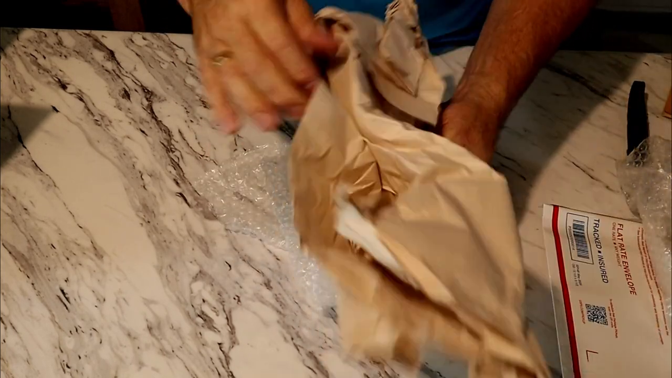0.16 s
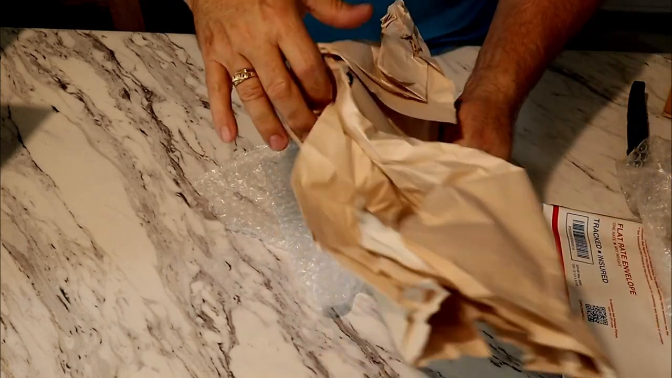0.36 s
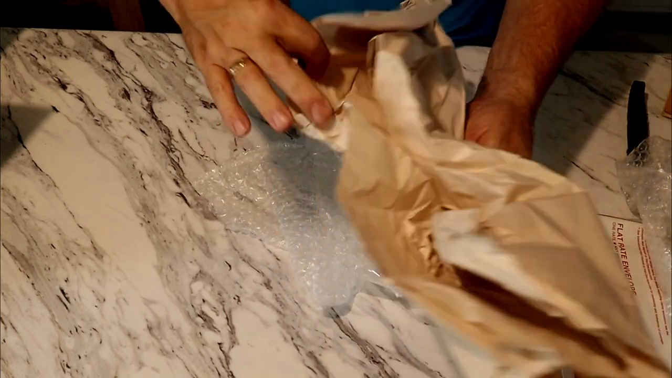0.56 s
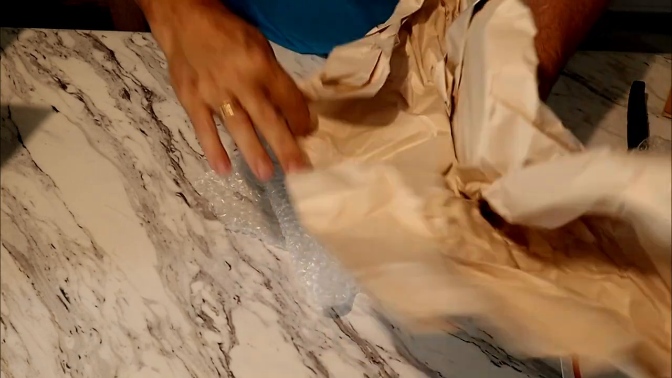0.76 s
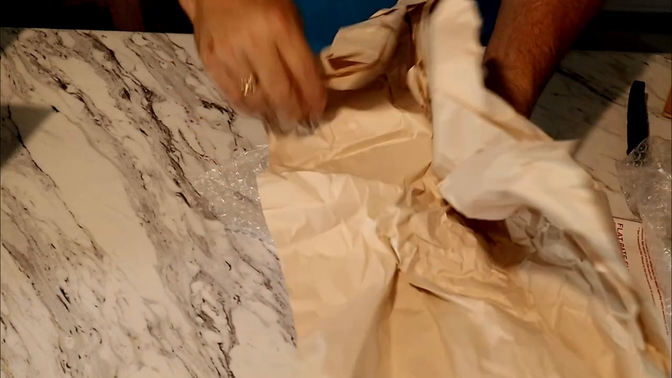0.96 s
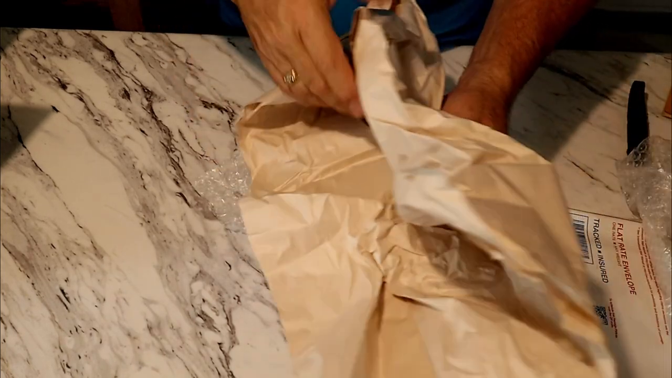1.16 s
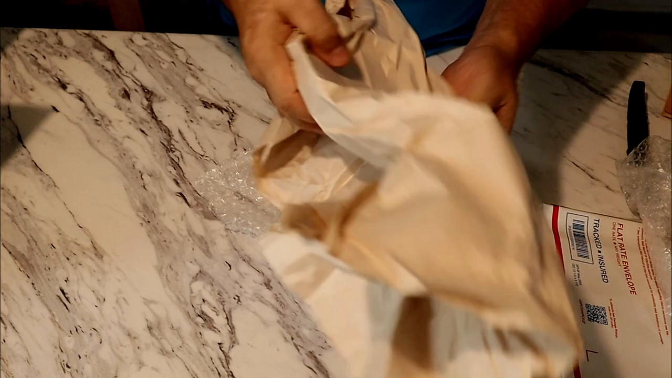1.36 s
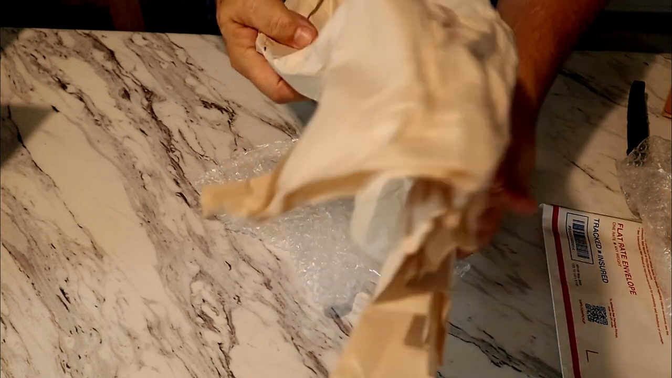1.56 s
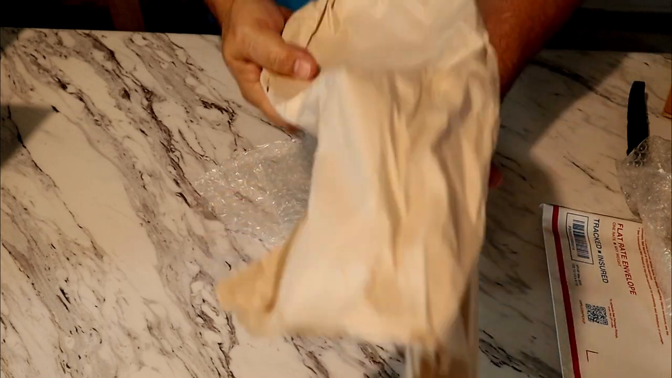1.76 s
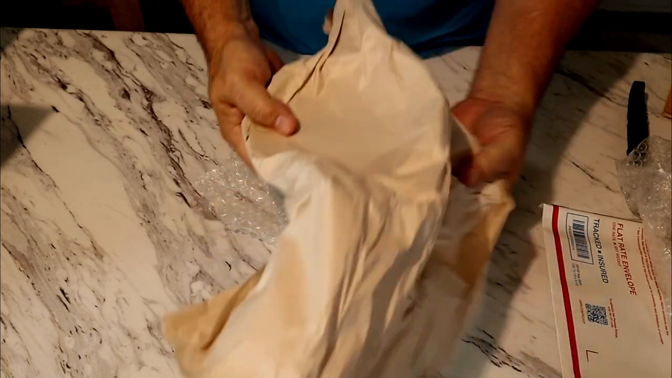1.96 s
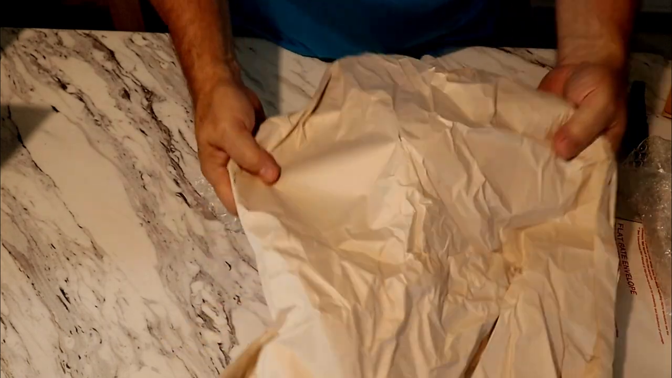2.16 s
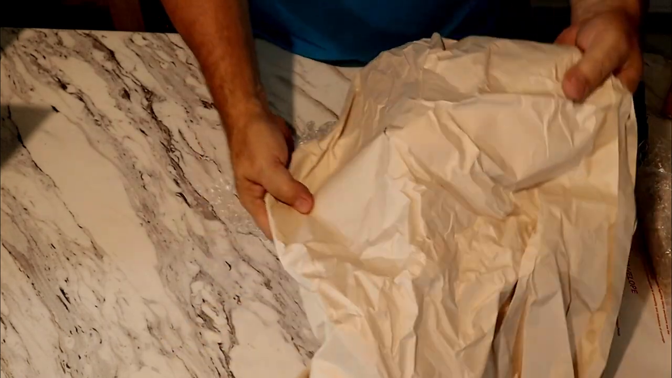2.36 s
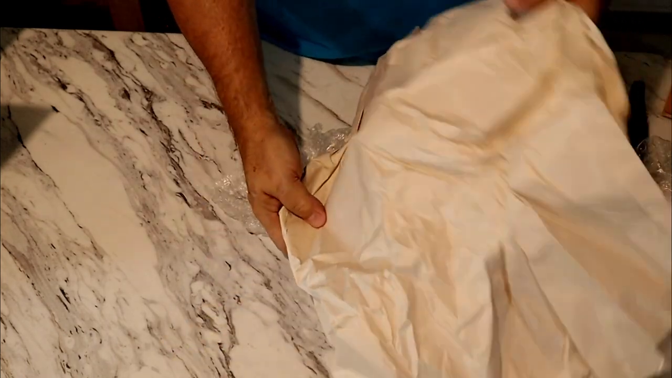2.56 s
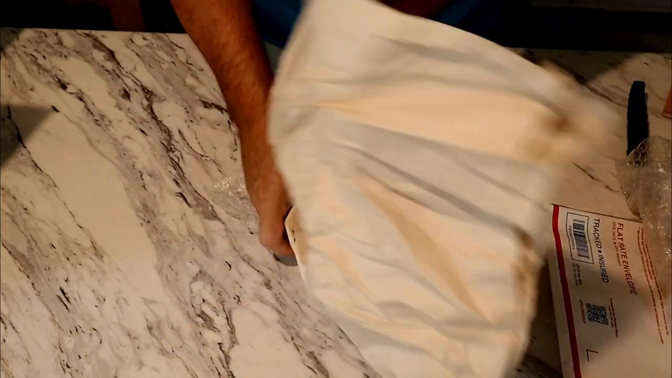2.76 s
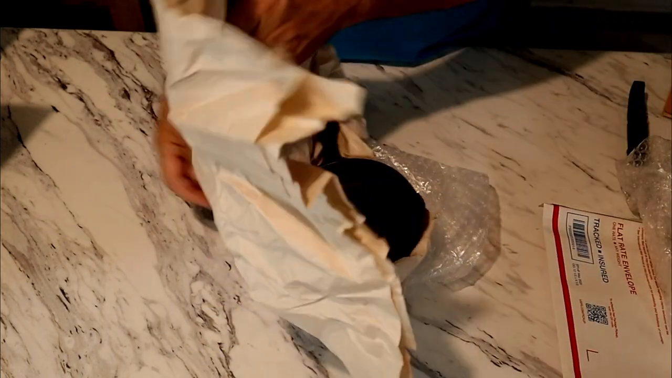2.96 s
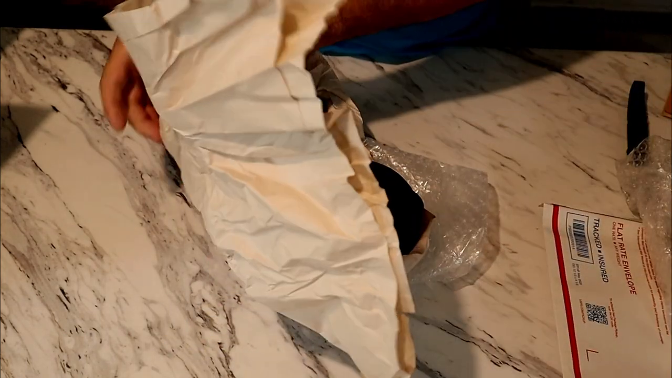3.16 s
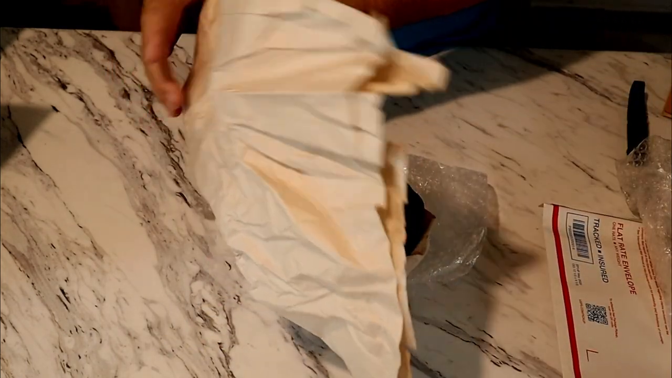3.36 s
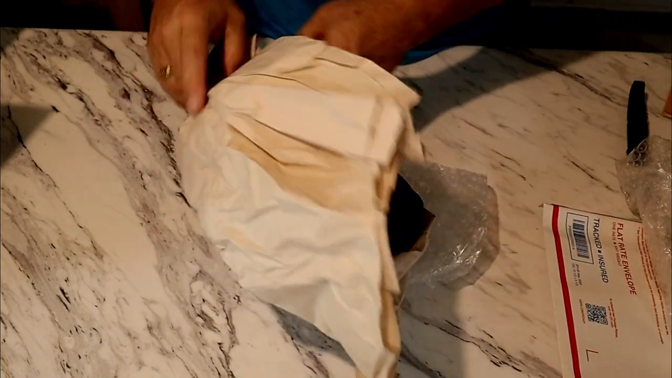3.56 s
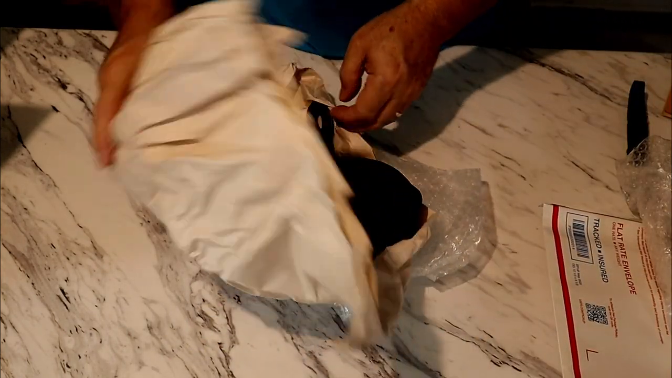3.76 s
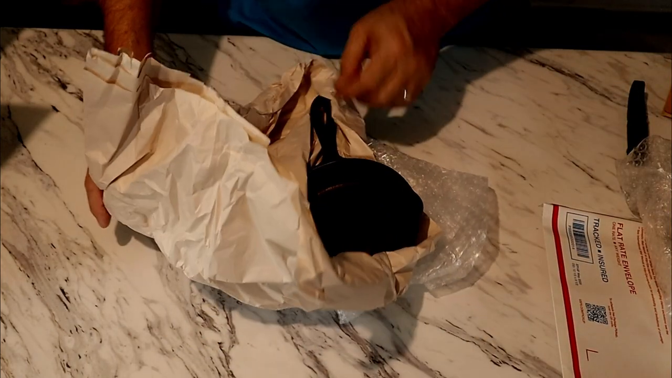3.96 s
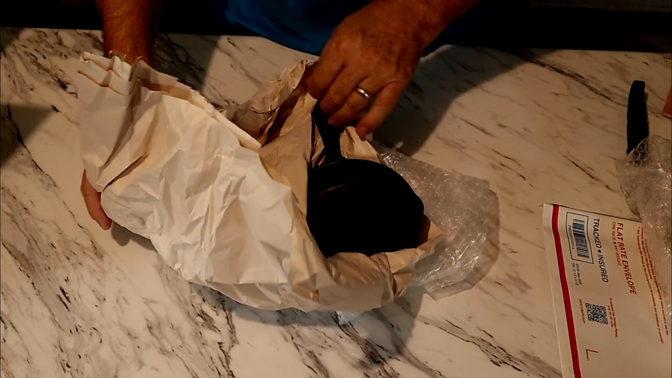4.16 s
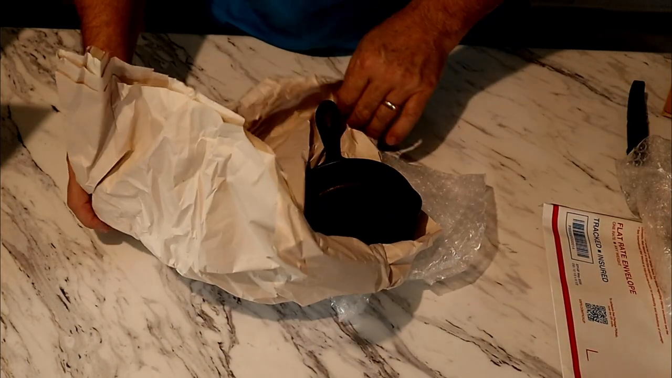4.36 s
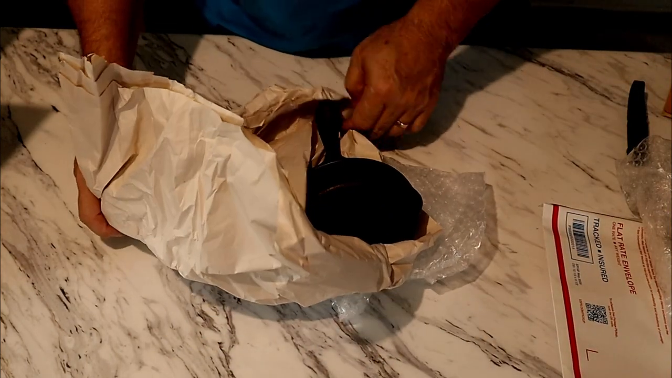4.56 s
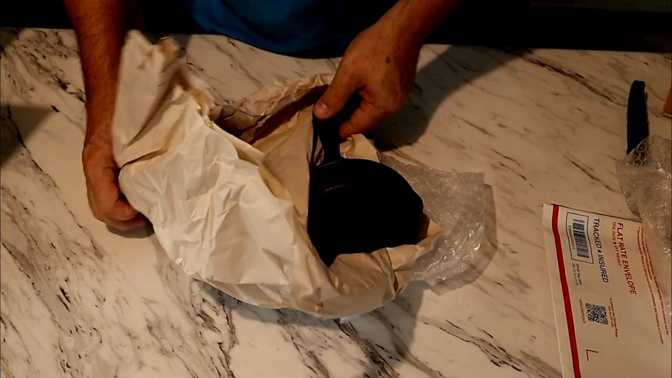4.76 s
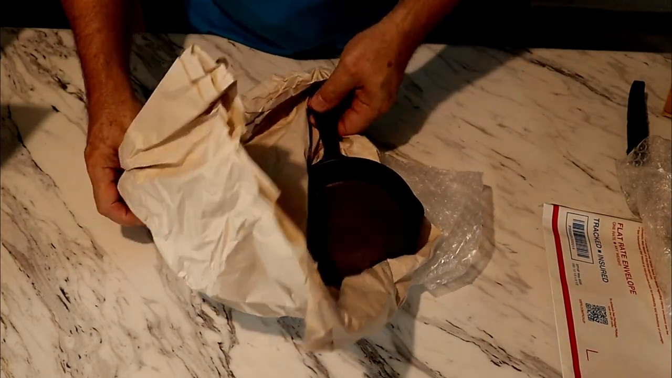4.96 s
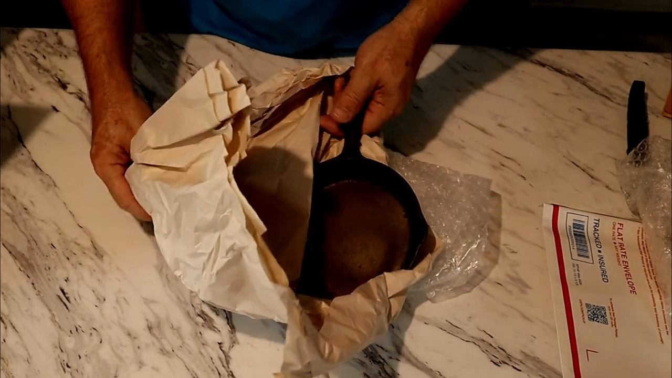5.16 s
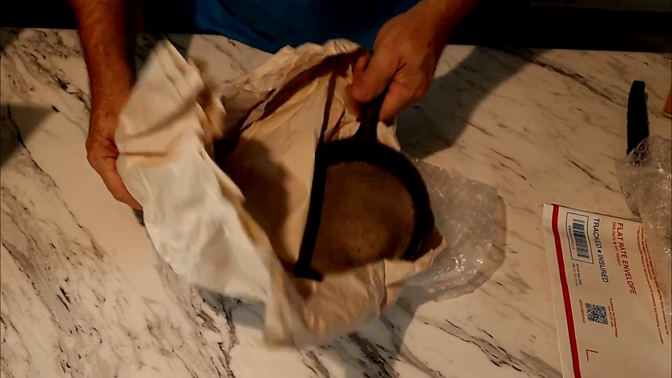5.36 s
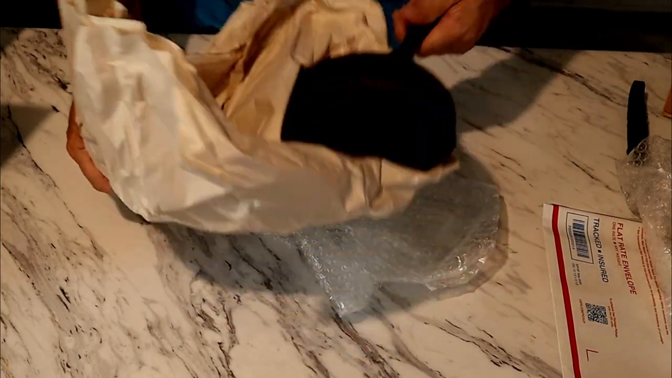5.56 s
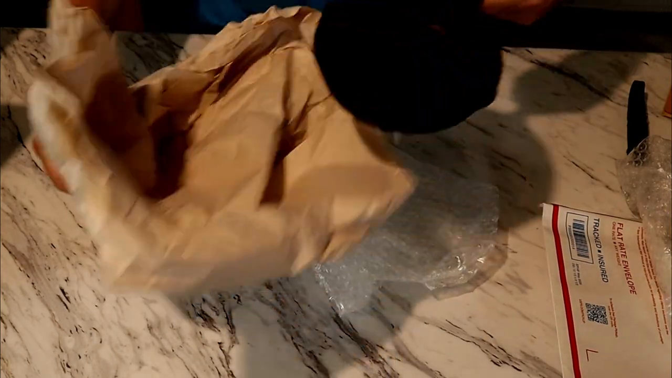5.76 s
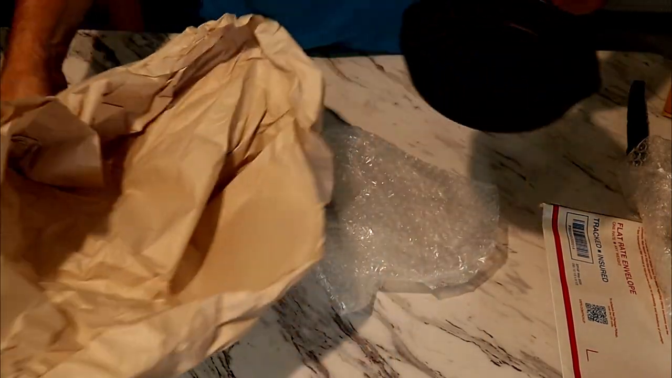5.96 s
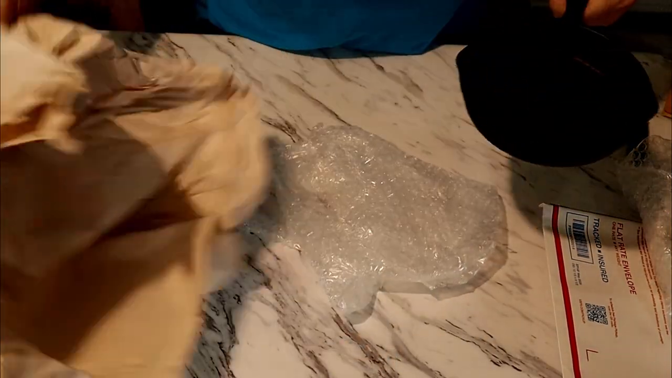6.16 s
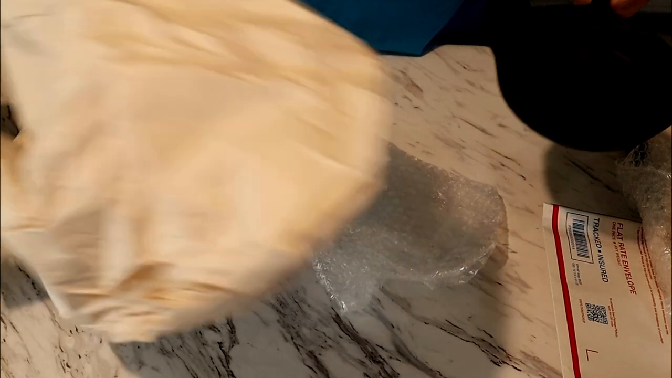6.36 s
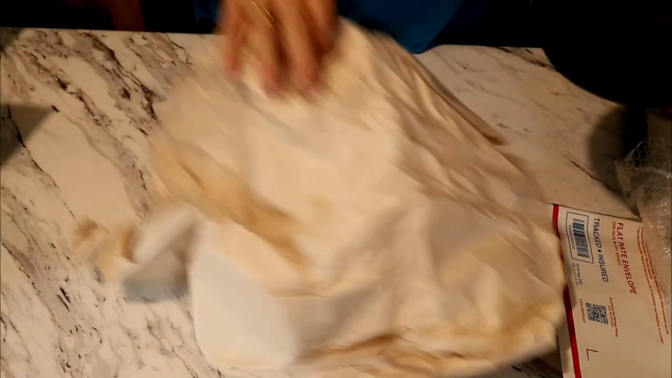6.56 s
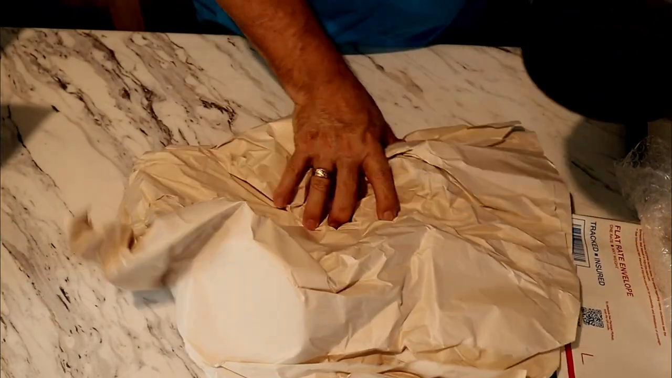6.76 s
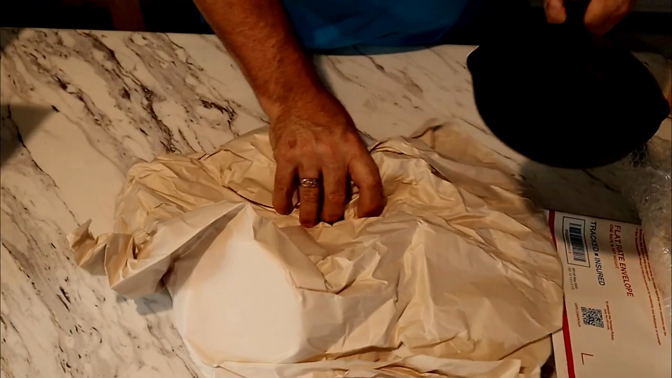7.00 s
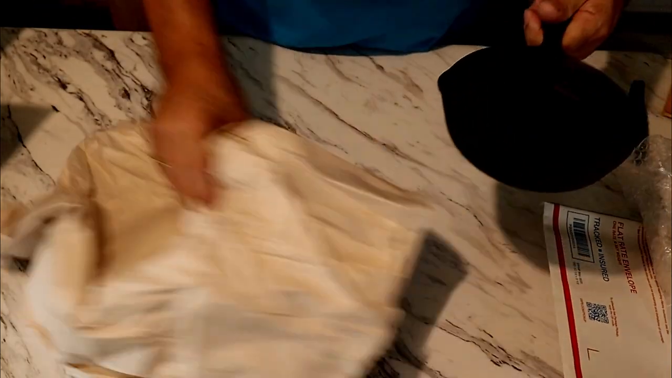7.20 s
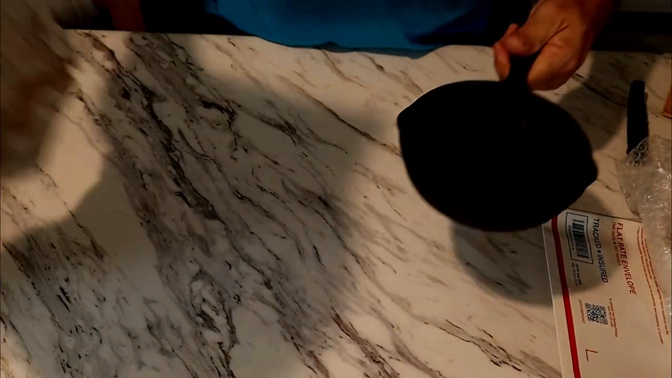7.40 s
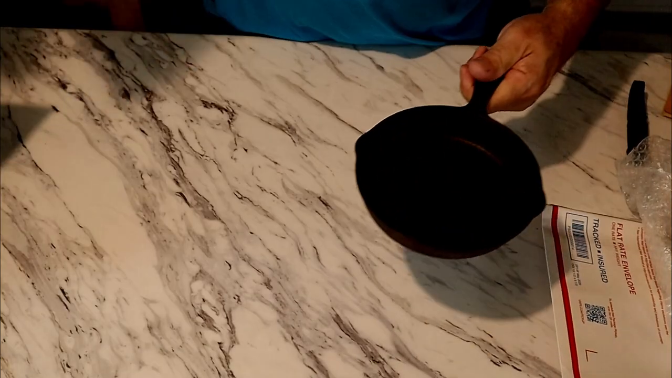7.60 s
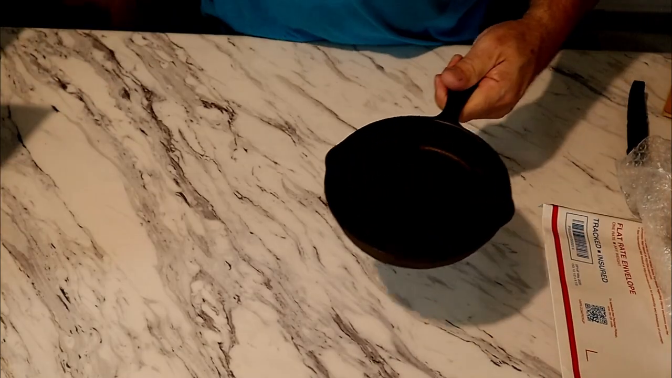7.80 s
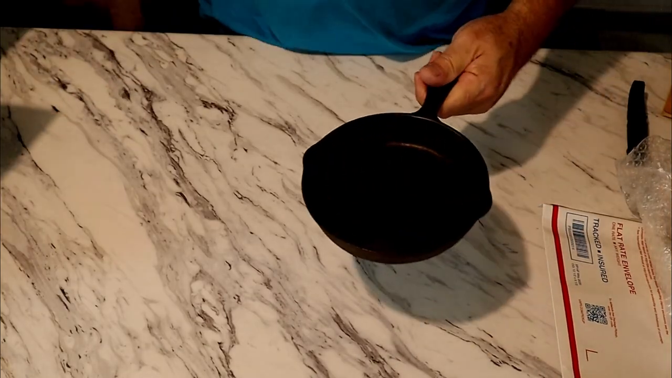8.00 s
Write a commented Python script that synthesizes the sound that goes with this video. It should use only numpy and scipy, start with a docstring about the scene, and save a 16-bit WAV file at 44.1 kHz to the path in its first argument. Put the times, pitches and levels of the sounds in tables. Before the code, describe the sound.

Close up in a small room, hands shake and pull stiff packing paper over a counter. Dense crinkling comes in short irregular strokes full of snapping creases, with a strong boomy flap near two seconds. Soft low bumps accompany the pan's unwrapping. After a quieter moment, the paper is pushed down in a loud crunch, swept aside, and fades to faint rustles over quiet room tone.

```python
"""A small room, at a counter, close microphone: crumpled packing paper comes off a small skillet lying
on bubble wrap, is shaken out and pushed aside. Strokes of the hands set filtered noise and swarms of
small crinkles sliding and flexing; single creases snap in two quick steps of crack, ring and pop.
Damped low resonances make the sheet's booms and the counter's bumps. A decaying noise tail is the
room's answer, steady noise its background; the highest peaks overload and are rounded off."""
import sys
import numpy as np
from scipy import signal
from scipy.fft import rfft, irfft, next_fast_len
from scipy.io import wavfile
from scipy.ndimage import uniform_filter1d

SR = 44100
rng = np.random.default_rng(int(sys.argv[2]) if len(sys.argv) > 2 else 0)


def wrap_up_sound(samples):
    """Save the sound to the file named by the first command line argument, as 16-bit audio."""
    columns = np.atleast_2d(samples).T
    # keep every value between -1 and 1, then stretch to whole-number steps
    tamed = np.clip(columns, -1, 1)
    steps = np.round(tamed * 32767).astype(np.int16)
    wavfile.write(sys.argv[1], SR, steps)


N = 354420  # length of the scene [samples]

# steady background of the room: (frequency [Hz], relative level per Hz [dB])
AMBIENCE_COLOUR = [(25, -13), (120, 1.5), (700, -4), (15000, -24)]
# pulls, shakes and pushes of the sheet; levels come before the trims of the bands in sheet():
# (start [s], length [s], level at mid-stroke [dB], swell from start to end [dB], low flexing re level [dB],
#  crisp treble re level [dB], tautness as upper over lower rustle [dB])
HAND_STROKES = [(0.003, 0.14, -24.5, -7.5, -5.5, -4.5, 2.5), (0.199, 0.046, -26, -3, -5, -3.5, 3.5),
                (0.322, 0.021, -23, 1.5, -5.5, -4, 2.5), (0.466, 0.2, -25, 2, -6.5, -3.0, 4),
                (0.789, 0.085, -26.5, -7, -2.5, -7, 3), (0.876, 0.18, -25.5, 0.5, -4, -2.5, 6),
                (1.152, 0.024, -32.0, 1, -5, 0.5, -3), (1.313, 0.039, -29, 4.5, -5, -1, 4),
                (1.48, 0.16, -29.5, -9, -7.5, -4, 3.5), (1.891, 0.023, -25.5, 5.5, -11, -5, 5.5),
                (1.984, 0.16, -22, -6.5, -3, -5, 3.5), (2.208, 0.085, -21.5, 5, -2, -7.0, 3),
                (2.487, 0.16, -27.5, 0.5, -2.5, -4.5, 4.0), (2.745, 0.19, -25.0, 3.5, -6.5, -7.5, 5.5),
                (2.914, 0.12, -24.5, 16, -6.0, -3.5, 4.5), (3.19, 0.13, -32, -10.5, -7, -1.5, 5.5),
                (3.265, 0.07, -23, -0.5, -4, -4, 3.5), (3.51, 0.1, -22, 8, -3.5, -1.5, 4.5),
                (3.695, 0.19, -22.5, 8.0, -5, -3, 6), (3.932, 0.098, -23.5, 0.5, -4.5, -3.5, 3),
                (4.259, 0.2, -25.5, 8.5, -7, -2, 6.5), (4.521, 0.043, -27.5, 5, -5.5, -2.5, 6),
                (4.648, 0.17, -28, 15, -8, -2, 5.5), (4.907, 0.082, -27, 13.0, -5.5, -4, 8),
                (5.076, 0.37, -26.5, -7.5, -6.0, -3, 4.5), (5.464, 0.22, -21.5, 9.5, -5, -1, 5),
                (5.834, 0.055, -34.5, 11, -9, -12, 0), (5.982, 0.106, -39.5, 14.5, -5.5, -3.5, 3),
                (6.159, 0.12, -30.5, 6.5, -7.0, -0.5, 4.5), (6.365, 0.058, -33, -3, -1.5, 2, 2.0),
                (6.5, 0.17, -33.5, -4.5, -4, 0, 5), (6.678, 0.15, -17, 7, -5.5, -2, 2.5),
                (6.948, 0.088, -19, -3, -7.0, -2, 4.5), (7.102, 0.36, -28.5, -8.5, -7.0, -2.5, 5),
                (7.511, 0.23, -37, 2, -2, -3.5, -1.0), (7.865, 0.19, -32, 7, -5, -7.5, -0.5)]
# colour of the rustling sheet: (frequency [Hz], relative level per Hz [dB])
PAPER_COLOUR = [(25, -37), (60, -15.5), (125, -12.5), (290, -6), (360, -0.5), (415, -2), (490, -0.5),
                (800, 0.5), (1900, -0.5), (2500, -5.5), (3300, -2.5), (6500, -11), (11500, -23.5),
                (16000, -33)]
# fine hiss of paper gliding over bubble wrap and counter: (time [s], level re the crisp gain [dB])
GLIDE_HISS = [(0, -17), (2.7, -35), (3.3, -8.5), (3.7, -27), (5.2, -14), (6.3, -31)]
# reverberation of the room: (frequency [Hz], time to fall by 60 dB [s])
ROOM_DECAY = [(200, 0.61), (2000, 0.42), (12000, 0.42)]
# creases that buckle loudly; snaps() trims the level and raises the crack by fixed amounts:
# (time [s], level [dB], pitch of the facet [Hz], crack re level [dB], low pop re level [dB])
CREASE_SNAPS = [(0.0633, -14, 776, -29, -23), (0.103, -13, 2150, -21, -27), (0.22, -16, 1270, -18, -9),
                (0.256, -8.5, 1230, -44, -5.5), (0.293, -12.5, 1910, -15.5, -27),
                (0.3634, -12, 2260, -15, -22), (0.4659, -18, 1690, -25, -3.5),
                (0.5179, -13.5, 2330, -18, -18), (0.5735, -20, 1140, -10, 2),
                (0.584, -13.5, 2560, -21, -10), (0.6368, -14, 1890, -12.5, -22),
                (0.654, -12.5, 2250, -21, -23), (0.7048, -17, 2720, -19, -18),
                (0.7724, -13.5, 575, -24.5, -9), (0.869, -16, 2100, -22, -14),
                (0.8807, -14.5, 2300, -29, -23), (0.8923, -25.5, 1320, -10, 9),
                (0.9427, -12, 1820, -28, -7), (0.9834, -18.5, 1610, -4, 5.5), (1.161, -17.5, 1500, -8, 4),
                (1.176, -11, 1590, -34, -21), (1.2836, -13, 1800, -13.5, -13),
                (1.3397, -16.5, 2830, -17, -18), (1.387, -28, 2000, -2, -18),
                (1.4226, -15, 1900, -32, -7.5), (1.5112, -10.5, 2000, -20, -4.5),
                (1.6361, -10.5, 2060, -18.5, -7.5), (1.8803, -21.5, 2000, -22, -9),
                (1.927, -15.5, 2680, -7, -22), (1.9405, -20, 2600, -4.5, -22),
                (1.9964, -8.5, 1500, -19, -12), (2.0466, -11, 1160, -14, -16),
                (2.0627, -5.5, 1700, -19.5, -27), (2.1747, -11, 1620, -23, -10),
                (2.234, -11.5, 2280, -11.5, -5), (2.266, -13, 1400, -15, -8),
                (2.6463, -19.5, 3500, -32, -17), (2.6875, -11, 1610, -18.5, -19),
                (2.7724, -17.5, 3400, -24, -20), (2.8391, -16.5, 2620, -33, -14),
                (2.909, -14, 2200, -17, -17), (2.9767, -10.5, 1460, -16, -4),
                (3.1607, -17.5, 1890, -13.5, -4.5), (3.1803, -17.5, 1420, -14.5, -2),
                (3.2709, -7, 1110, -33, -8), (3.3094, -8, 1710, -22, -8), (3.3346, -15, 1810, -14, -5),
                (3.434, -22.5, 3500, -10.5, -18), (3.6232, -9.5, 1640, -27, -8),
                (3.9446, -8.5, 1440, -30, -6), (3.9974, -16, 1970, -18, -6), (4.068, -14, 1530, -32, -27),
                (4.224, -20.5, 1600, -46, -24), (4.278, -18.5, 2230, -31, -7.5),
                (4.3853, -10, 1570, -13, -13), (4.458, -23, 2300, -0.5, -2), (4.615, -20, 750, -27, 0),
                (4.8906, -11, 2860, -39, -9), (4.9654, -15.5, 1680, -20, 1.5),
                (5.0048, -15, 1050, -13, 0.5), (5.363, -7, 1320, -27, -10), (5.6303, -11.5, 1220, -27, -7),
                (5.7394, -8.5, 1620, -14, -3), (5.8328, -18, 2150, -34, -13), (5.951, -26, 2530, -10, -16),
                (5.986, -17, 1370, -36, -34), (6.03, -15, 1710, -18.5, -10),
                (6.4187, -11.5, 1870, -14.5, 0), (6.6045, -15, 2600, -19, -6.5),
                (6.6509, -6.5, 2330, -28, -7), (6.681, -8, 1870, -34, -12), (6.717, -9, 2530, -25, -11),
                (6.888, -20, 2400, -5, -14), (7.023, -7.5, 3200, -12.5, -23), (7.0649, -8, 1940, -20, -13),
                (7.1246, -11.5, 1190, -33, -10), (7.2034, -12, 1330, -15.5, -5.5),
                (7.424, -17, 1810, -30, -24), (7.672, -26.5, 2200, -9.5, -14)]
# hands, pan and bundle bump softly on the counter; bumps() raises the level by a fixed amount:
# (time [s], level [dB], pitch [Hz])
COUNTER_BUMPS = [(.89, -44, 90), (3.022, -30, 175), (3.255, -31, 85.5), (3.329, -34, 160),
                 (4.032, -41.5, 90), (4.385, -32.5, 124), (5.61, -41, 55), (5.70, -37, 110),
                 (6.298, -41, 90), (6.409, -34, 192), (6.748, -29, 169), (8.012, -34.5, 110)]
# large panels flap and sound the hollow under the sheet; flaps() trims the level by a fixed amount:
# (time [s], level [dB], time to fall by 60 dB [s])
PANEL_FLAPS = [(1.029, -18.5, 0.14), (1.161, -27, .1), (2.041, -5, 0.087), (2.252, -19.5, 0.41),
               (2.33, -21.5, 0.2), (2.57, -26, 0.39), (6.66, -22, 0.68)]
# resonances of that hollow: (frequency [Hz], sharpness q [no unit])
HOLLOW_MODES = [(358, 26), (490, 10)]

TOP_HZ = 16000  # band limit of the recorder
LEAD = 64  # samples in which a crease starts to give way before it flips
ATTACK_DB_PER_S, RELEASE_DB_PER_S = 650, 133  # a hand sets the paper going quickly; it settles more slowly
STEP_S, STEP_DB = 0.0022, -6.5  # second step of a crease: greatest delay, level re the first
STILL_HISS_DB, FAST_HISS_DB = -10, -5.5  # hiss re the crinkles: always there, most that speed can add


def amp(db):
    """Decibels to gain."""
    return 10 ** (np.asarray(db) / 20)


def unit(x):
    """Each row scaled to rms 1."""
    return x / np.sqrt(np.mean(x ** 2, axis=-1, keepdims=True) + 1e-20)


def along(points, hz):
    """(Hz, value) points read on a log axis."""
    f, v = np.transpose(points)
    return np.interp(np.log(hz + 1), np.log(f), v)


def coloured(x, gain):
    """x through the causal, minimum-phase filter whose gain is the given function of frequency."""
    n = x.shape[-1]
    m = 2 * next_fast_len(n)
    log_gain = np.log(np.maximum(gain(np.fft.rfftfreq(m, 1 / SR)), 1e-6))
    cepstrum = irfft(log_gain, m)
    # folding the cepstrum onto positive times makes the filter causal
    cepstrum[..., 1:m // 2] *= 2
    cepstrum[..., m // 2 + 1:] = 0
    response = np.exp(rfft(cepstrum))
    return irfft(rfft(x, m) * response, m)[..., :n]


def below(f, edge_hz, order=4):
    """Gain of a low-pass."""
    return 1 / np.sqrt(1 + (f / edge_hz) ** (2 * order))


def above(f, edge_hz, order=4):
    """Gain of a high-pass."""
    return (f / edge_hz) ** order * below(f, edge_hz, order=order)


def facet(f, hz, q):
    """Gain of a damped resonance, such as one stiff patch of paper; low q is broad."""
    return 1 / np.sqrt(1 + (q * (f / hz - hz / (f + 1))) ** 2)


def placed(times, sounds):
    """Short sounds, one a row, summed at their times."""
    start = np.round(np.abs(times) * SR).astype(int)
    index = start[:, None] + np.arange(sounds.shape[1])
    return np.bincount(index.ravel(), sounds.ravel(), N)[:N]


def even(x, seconds):
    """x at about rms 1 over every short stretch, keeping its fine grain."""
    size = int(seconds * SR)
    power = uniform_filter1d(uniform_filter1d(x ** 2, size), size)
    return x / np.sqrt(np.abs(power) + 1e-12)


def ambience():
    """Steady background of the room: coloured noise at rms 1."""
    return unit(coloured(rng.standard_normal(N), lambda f: amp(along(AMBIENCE_COLOUR, f))))


def strokes():
    """Gains of the flexing, slack, taut and crisp sound: a stroke sets in, swells or eases off, settles."""
    time = np.arange(0, N, 32) / SR
    start, length, db, swell_db, flex_db, crisp_db, taut_db = np.transpose(HAND_STROKES)[:, :, None]
    t = time - start
    held_db = db + swell_db * (np.clip(t / length, 0, 1) - 0.5)
    onset_db = -ATTACK_DB_PER_S * np.maximum(-t, 0)
    settling_db = -RELEASE_DB_PER_S * np.maximum(t - length, 0)
    effort = amp(held_db + onset_db + settling_db)
    # slack and taut rustle share the power of the stroke
    slack = 1 / np.hypot(1, amp(taut_db))
    taut = slack * amp(taut_db)
    shares = amp(flex_db), slack, taut, amp(crisp_db)
    # overlapping strokes add in power
    gains = [np.linalg.norm(effort * share, axis=0) for share in shares]
    return [np.interp(np.arange(N) / SR, time, gain) for gain in gains]


def shivers(count, scatter_db, rise, t60):
    """Buckles, one a row: the crease gives, flips with a kick, and bending waves scatter among the folds."""
    t = (np.arange(SR // 50) - LEAD) / SR
    giving_way = np.exp(np.minimum(t, 0) / rise)
    dying_away = amp(-60 * np.maximum(t, 0) / t60)
    waves = rng.standard_normal((count, len(t))) * giving_way * dying_away
    waves *= amp(scatter_db) / np.linalg.norm(waves, axis=1, keepdims=True)
    kick = rng.choice([-1, 1], (count, 1)) * (t == 0)
    return waves + kick


def crinkles(count, spread_db, pitch_hz, pitch_spread, q, scatter_db, t60):
    """A swarm of small buckles, mostly weak, a few strong, each on a facet of its own pitch."""
    hz = pitch_hz * np.exp(pitch_spread * rng.uniform(-1.037, 1, (count, 1)))
    size = amp(spread_db * np.minimum(rng.exponential(size=(count, 1)), 2.6))
    buckles = shivers(count, scatter_db, rise=0.00095, t60=t60)
    grains = coloured(buckles, lambda f: facet(f, hz, q) ** 2)
    return unit(placed(rng.uniform(0, N / SR, count), size * unit(grains)))


def sheet():
    """Crinkles ride on the hiss of sliding paper; wide panels flex low, tight creases sound crisp."""
    flex, slack, taut, crisp = strokes()
    ticks = crinkles(count=1100, spread_db=3.5, pitch_hz=2830, pitch_spread=1.06, q=0.16,
                     scatter_db=13, t60=0.04)
    plinks = crinkles(count=3000, spread_db=6.5, pitch_hz=2550, pitch_spread=1.14, q=1.92,
                      scatter_db=0.5, t60=0.032)
    clicks = crinkles(count=260, spread_db=4.5, pitch_hz=3500, pitch_spread=0.94, q=0.5,
                      scatter_db=2.5, t60=0.01)
    tilt = [(60, 23.5), (600, 5.0), (1100, 0.5), (12000, 10.0)]  # (frequency [Hz], gain [dB])
    swarm = coloured(ticks + amp(-2.0) * clicks + 0.79 * plinks, lambda f: amp(along(tilt, f)))

    # the faster the sheet moves, the more its crinkles merge into hiss
    rustle = np.hypot(slack, taut)
    haste = rustle / (rustle + amp(-22))
    hiss = (amp(STILL_HISS_DB) + amp(FAST_HISS_DB) * haste) * rng.standard_normal(N)
    drive = unit(swarm) + hiss

    def part(band):
        paper_band = coloured(drive, lambda f: amp(along(PAPER_COLOUR, f)) * band(f))
        return even(paper_band, seconds=0.077)

    panels = amp(0.22) * flex * part(lambda f: below(f, 811))
    loose = amp(3.97) * slack * part(lambda f: above(f, 808) * below(f, 1073))
    tight = amp(1.38) * taut * part(lambda f: above(f, 1770) * below(f, 2834))
    creases = amp(-0.66) * crisp * part(lambda f: above(f, 3116))
    glide_db = np.interp(np.arange(N) / SR, *np.transpose(GLIDE_HISS))
    glide = crisp * amp(glide_db) * part(lambda f: above(f, 8100))
    return panels + loose + tight + creases + glide


def room(x, wet_db):
    """Cupboards and walls return a short, diffuse tail: noise that decays at its own rate in each band."""
    hz, t, z = signal.stft(rng.standard_normal(SR // 2), SR, nperseg=256)
    decay = amp(-60 * t / along(ROOM_DECAY, hz)[:, None])
    tail = signal.istft(z * decay, SR, nperseg=256)[1]
    # the first return comes 5 ms after the direct sound
    tail = np.pad(tail / np.linalg.norm(tail), (int(0.005 * SR), 0))
    return x + amp(wet_db) * signal.fftconvolve(x, tail)[:N]


def snaps():
    """A crease flips in two quick steps: a sharp crack, a few swings of its facet and a pop of pushed air."""
    s, db, hz, crack_db, pop_db = np.transpose(CREASE_SNAPS)[:, :, None]

    def burst(scatter_db, t60, gain):
        return unit(coloured(shivers(len(s), scatter_db, rise=0.00065, t60=t60), gain))

    def step():
        ring = burst(0, 0.023, lambda f: facet(f, hz, q=1.3) ** 2)
        crack = burst(12, 0.0092, lambda f: above(f, 3200, order=2) * below(f, 3330, order=2))
        pop = burst(0, 0.056, lambda f: above(f, 860, order=1) * below(f, 735, order=3))
        return amp(db - 9.5) * (ring + amp(crack_db + 11.0) * crack + amp(pop_db) * pop)

    # the table's time falls within the giving way, a third of LEAD before the flip
    first = s[:, 0] - LEAD / SR * 2 / 3
    second = first + STEP_S * rng.uniform(0.32, 1, len(s))
    return placed(first, step()) + amp(STEP_DB) * placed(second, step())


def puffs(gain, t60):
    """Soft, low pushes of air, one a row: a resonance swells for a moment and dies away."""
    t = np.arange(SR // 3) / SR
    hum = unit(coloured(rng.standard_normal((len(t60), len(t))), gain))
    swell = 1 - np.exp(-t / 0.0057)
    return even(hum, seconds=0.045) * swell * amp(-60 * t / t60)


def bumps():
    """Dull thuds of the counter: broad low resonances that die away quickly."""
    s, db, hz = np.transpose(COUNTER_BUMPS)[:, :, None]
    thuds = puffs(lambda f: facet(f, hz, q=0.9) ** 2, t60=np.full_like(s, 0.2))
    return placed(s[:, 0], amp(db + 3.0) * thuds)


def flaps():
    """The billowing sheet booms in its own hollow, on two narrow resonances."""
    s, db, t60 = np.transpose(PANEL_FLAPS)[:, :, None]

    def hollow(f):
        return sum(facet(f, hz, q) ** 2 for hz, q in HOLLOW_MODES)

    return placed(s[:, 0], amp(db - 0.5) * puffs(hollow, t60))


def scene():
    """The paper in the quiet room, as one channel."""
    handling = room(sheet() + bumps() + flaps(), wet_db=-10)
    snapping = room(snaps(), wet_db=-9.5)
    return (handling + snapping + amp(-48.5) * ambience())[None]


def record(dry):
    """The recorder rounds off the highest peaks and keeps nothing above its band limit."""
    held = dry / (1 + np.abs(dry) ** 6) ** (1 / 6)
    m = next_fast_len(N + SR // 2)
    kept = np.fft.rfftfreq(m, 1 / SR) < TOP_HZ
    return irfft(rfft(held, m) * kept, m)[..., :N]


dry = scene()
out = record(dry)
wrap_up_sound(out)
```